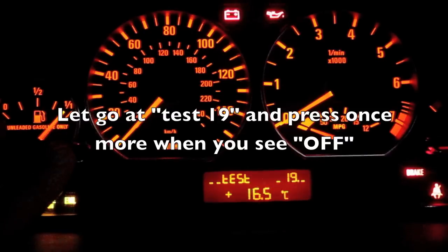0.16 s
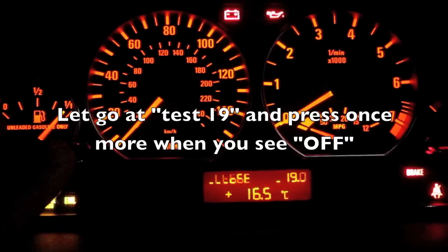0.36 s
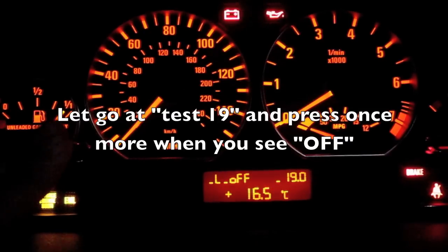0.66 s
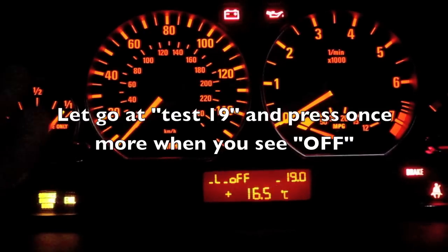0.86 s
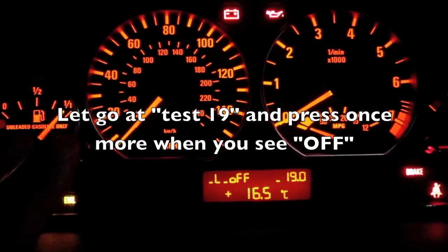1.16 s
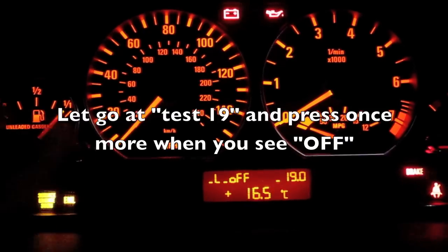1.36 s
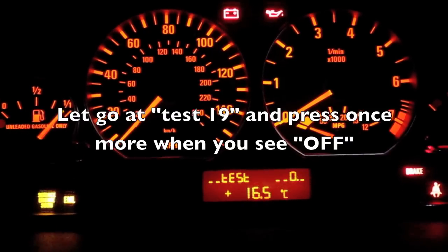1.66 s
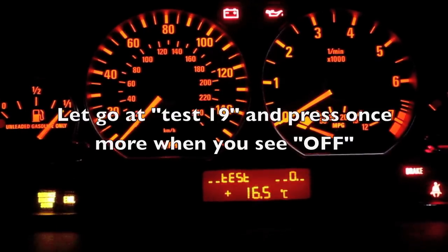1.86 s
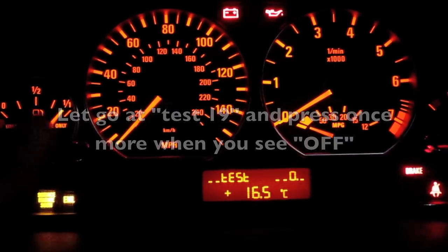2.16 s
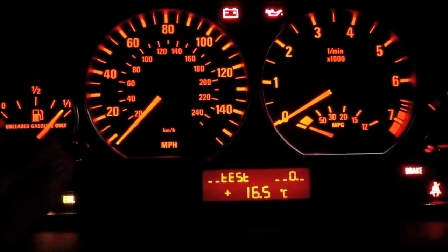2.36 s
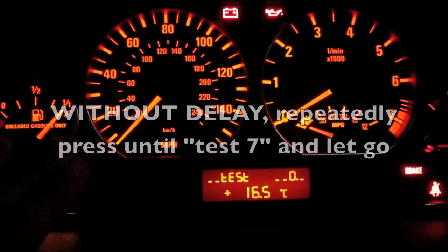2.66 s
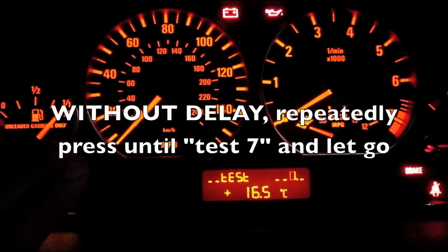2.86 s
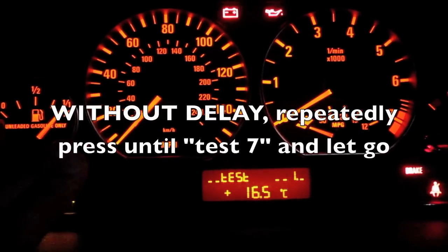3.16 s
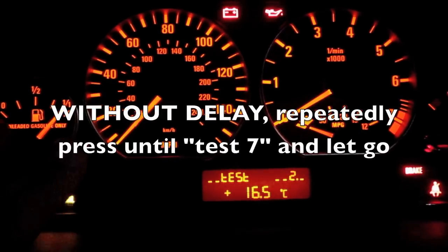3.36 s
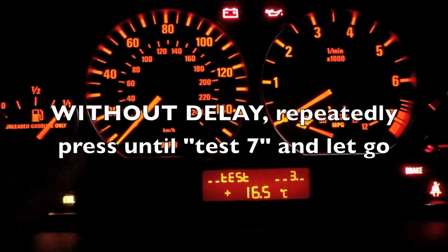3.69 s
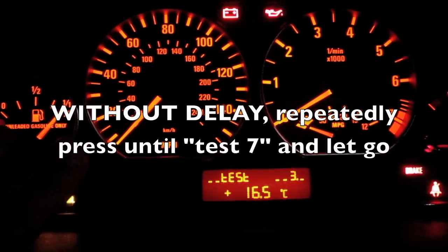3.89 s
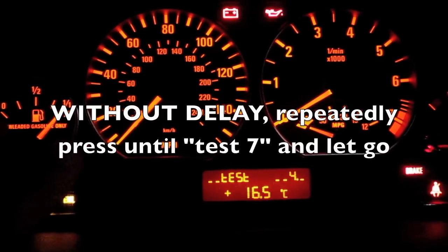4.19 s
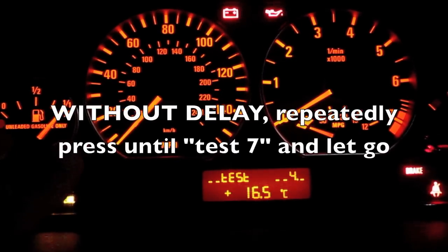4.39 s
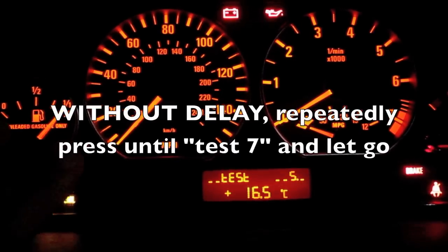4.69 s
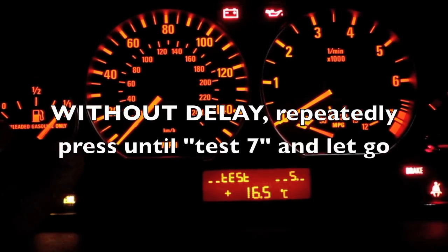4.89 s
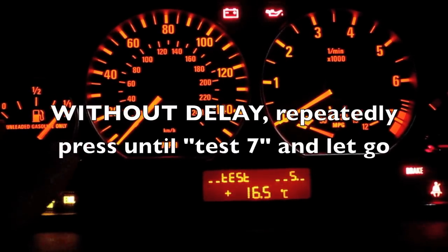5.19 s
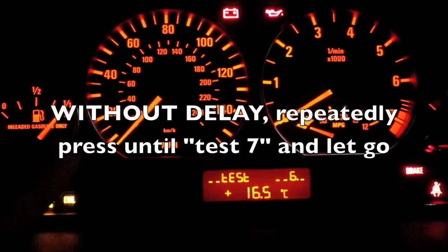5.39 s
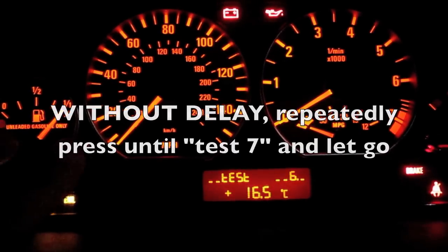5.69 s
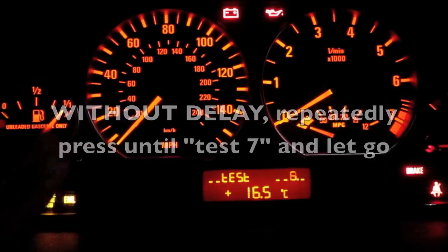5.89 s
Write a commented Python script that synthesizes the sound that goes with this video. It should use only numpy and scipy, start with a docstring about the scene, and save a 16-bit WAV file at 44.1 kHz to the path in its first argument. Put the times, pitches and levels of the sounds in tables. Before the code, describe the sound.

A small plastic dashboard button is pressed eight times, each a crisp click and softer release, over a low wavering hum in a parked car.

```python
"""A low, slightly wavering hum over rumble and faint hiss; then a small panel button is pressed eight times.
On each press the stem rubs in and catches in its guide, and a spring contact snaps and rings.
On release the contact opens with one bounce and the stem rubs out; loose knocks, ticks and nudges surround it.
Contacts, knocks and nudges ring decaying modes of one plastic panel; rubs and ticks are shaped noise.
All button sounds scatter in the small, well damped cabin of a parked car."""
import sys
import numpy as np
from scipy import signal
from scipy.fft import rfft, irfft
from scipy.io import wavfile

SR = 44100
rng = np.random.default_rng(int(sys.argv[2]) if len(sys.argv) > 2 else 0)


def wav_out(sig):
    """Save sig, one row per channel (or a flat mono array), as 16-bit PCM at SR to the path in sys.argv[1]."""
    wavfile.write(sys.argv[1], SR, np.round(np.clip(np.atleast_2d(sig).T, -1, 1) * 32767).astype(np.int16))


N = 266452
RING_S = np.arange(8192) / SR  # time axis of one ring or echo


def from_db(db):
    """Decibels to amplitude gain."""
    return 10 ** (np.asarray(db) / 20)


def add(track, start_s, sound):
    """Mix a sound into the track at start_s, cut at the track end."""
    at = int(round(start_s * SR))
    track[at:at + len(sound)] += sound[:N - at]


def noise(colour, size):
    """Noise of rms 1; colour levels are interpolated over log frequency."""
    colour_hz, colour_db = np.transpose(colour)
    bins_hz = np.maximum(np.fft.rfftfreq(size, 1 / SR), 1)
    gain = from_db(np.interp(np.log(bins_hz), np.log(colour_hz), colour_db))
    x = irfft(rfft(rng.standard_normal(size)) * gain, size)
    return x / x.std()


def burst(colour, t60_s, rise_s):
    """Countless short-lived modes ring as a dying puff of noise."""
    decay = from_db(-60 * RING_S / t60_s)
    onset = 1 - np.exp(-RING_S / rise_s)
    return noise(colour, len(RING_S)) * decay * onset


def low_pass(x, corner_hz):
    """A softer contact loses the treble above its corner."""
    return signal.sosfilt(signal.butter(2, min(corner_hz, .45 * SR), fs=SR, output="sos"), x)


def peak(x, hz, width_hz):
    """The part of x that passes one resonance."""
    return signal.lfilter(*signal.iirpeak(hz, hz / width_hz, fs=SR), x)


def struck(hz, t60_s, level_db, vary_db):
    """Struck modes decay as damped sines; level_db is resonance height, varied randomly per blow."""
    decay_per_s = np.log(1000) / t60_s
    height = from_db(level_db + vary_db * rng.standard_normal(len(hz)))
    amplitude = height * 2 * decay_per_s / SR
    envelopes = np.exp(-np.outer(decay_per_s, RING_S))
    return amplitude @ (envelopes * np.sin(2 * np.pi * np.outer(hz, RING_S)))


# rumble and hiss spectrum: (frequency [Hz], relative level [dB per Hz])
AIR_COLOUR = [(18, -15.5), (27, -14), (35, -10), (55, -4.5), (100, -9), (160, -14.5), (220, -19.5),
              (300, -23.5), (500, -29.5), (1000, -32.5), (2500, -41), (6300, -45.5), (11700, -44),
              (16000, -53.5)]
# hum tones: (frequency [Hz], level [dB], wavering rate [1/s])
HUM_TONES = [(48.6, -47, 2.9), (73.04, -52, 1.3), (135.6, -58.5, 1.5)]


def hum(air_db=-46.5, waver=0.65):
    """Low tones waver in strength and phase by slow complex noise, over rumble and faint hiss."""
    t_s = np.arange(N) / SR
    out = from_db(air_db) * noise(AIR_COLOUR, N)
    for hz, level_db, rate_hz in HUM_TONES:
        slow_colour = [(rate_hz, 0), (4 * rate_hz, -24), (16 * rate_hz, -100)]
        drift = noise(slow_colour, N) + 1j * noise(slow_colour, N)
        tone = ((1 + waver * drift) * np.exp(2j * np.pi * hz * t_s)).real
        out = out + from_db(level_db) * tone / tone.std()
    return out


# panel modes: (frequency [Hz], t60 before ring_share [s],
#   level by press [dB], level by release [dB], level by stem knock [dB])
PANEL_MODES = [(132, 0.052, 18, 8, 9), (200.9, 0.099, 15, 6.5, 4), (264, 0.13, -2, 11, 0),
               (355, 0.26, -26, 15, -24), (419, 0.078, 10, 11.5, 13), (455, 0.078, 17, 8, 9),
               (510.5, 0.058, 6, 15, 11), (571, 0.073, 15, 8.5, 14), (598, 0.055, 14.5, 6, 11),
               (657, 0.04, 11.5, 9, 1.5), (755, 0.064, -9, -14, 5.5), (840, .06, -2, 5.5, 6),
               (958, 0.07, 9.5, 15.5, 11), (1058, 0.048, 7.5, -1.5, 12.5), (1184, 0.055, -7, 11.5, 8),
               (1262, 0.048, 7.5, 6, -2), (1369, 0.026, 4.5, -2, 10), (1587, 0.018, 7, 4, 11),
               (1729, 0.026, 1.5, -2.5, -5), (1843, 0.047, -17, -8, 1), (2057, 0.058, 5, -36, -1.5),
               (2180, 0.037, -30, -39, -1.5), (2810, 0.03, -3, -12, -6), (3253, 0.036, -7, -23.5, 0),
               (4120, 0.034, -10, -8.5, -8), (5005, .015, -14, -19, -10), (5780, 0.0148, -30, -13, -17)]
BY_PRESS, BY_RELEASE, BY_KNOCK = 0, 1, 2


def panel_blow(kind, vary_db, level_db, corner_hz, clack_db, clack_hz,
               ring_share=1, clack_q=2.9, radiate_hz=150):
    """One contact rings the panel; where it lands decides which pitch of the plastic clacks most."""
    hz, t60_s, *levels_db = np.transpose(PANEL_MODES)
    x = struck(hz, ring_share * t60_s, levels_db[kind], vary_db)
    x = x + (from_db(clack_db) - 1) * peak(x, clack_hz, clack_hz / clack_q)
    # all-pass: bending waves travel at unequal speeds, low notes come a moment after the crack
    for delay_hz, width_hz in ((460.0, 230), (1040, 520), (2300, 190), (4215, 490)):
        x = x - 2 * peak(x, delay_hz, width_hz)
    # a small panel radiates little bass
    x = signal.sosfilt(signal.butter(2, radiate_hz, "high", fs=SR, output="sos"), x)
    return from_db(level_db) * low_pass(x, corner_hz)


def fidgets(count=8, first_s=2.45, last_s=5.6, level_db=-25, corner_hz=1100, vary_db=2.5):
    """The resting finger nudges the stem: faint dull panel blows, one at random in each equal slot."""
    out = np.zeros(N)
    slot_s = (last_s - first_s) / count
    for k, chance in enumerate(rng.random(count)):
        nudge = panel_blow(BY_KNOCK, vary_db, level_db, corner_hz, clack_db=0, clack_hz=corner_hz)
        add(out, first_s + slot_s * (k + chance), nudge)
    return out


# stem resonances under friction: (frequency [Hz], width [Hz], level [dB])
STEM_MODES = [(1053, 188, 17), (1680, 550, 11), (2253, 840, 6.5), (4183, 1200, -0.5), (5020, 333, 5.5),
              (5700, 283, 2.5), (6390, 350, 3.5), (10100, 2500, -2.5), (12500, 2000, -5.5)]


def rub(length_s, level_db, grain_db=4.0, vary_db=2.5):
    """Grainy friction rings the stem modes, with alternating sign, while it travels."""
    size = int(length_s * SR)
    grain = noise([(100, -19), (400, -15), (2000, -18)], size)
    friction = rng.standard_normal(size) * from_db(grain_db * grain)
    x = np.zeros(size)
    for k, (hz, width_hz, mode_db) in enumerate(STEM_MODES):
        gain = from_db(mode_db + vary_db * rng.normal())
        x += gain * (-1) ** k * peak(friction, hz, width_hz)
    return from_db(level_db) * x / x.std() * signal.windows.tukey(size, .3)


# stem tick spectrum: (frequency [Hz], relative level [dB per Hz])
TICK_COLOUR = [(500, 4.5), (1200, 3.5), (2000, 1.5), (2800, -0.5), (3400, -6), (4200, -0.5), (6000, -10),
               (9000, -5.5), (10700, -1.5), (13000, -9), (16000, -20)]


def tick(level_db, corner_hz):
    """The stem ticks sharply against its guide: a short low-passed noise burst."""
    return from_db(level_db) * low_pass(burst(TICK_COLOUR, t60_s=0.017, rise_s=0.00024), corner_hz)


# contact closes; also played by presses():
#   (time [s], clack level [dB], inward rub level [dB], catch level [dB])
PRESSES = [(1.2349, -2.5, -49, -36.5), (2.6430, 5.5, -50.5, -33), (3.0274, 4.5, -52.5, -35.5),
           (3.448, 5, -57, -50), (3.8512, -5, -53, -34.5), (4.3171, 0, -55, -37),
           (5.0010, 10.5, -50.5, -34.5), (5.6400, 6, -57, -55)]
# contact opens; also played by releases(): (time [s], clack level [dB], outward rub level [dB])
RELEASES = [(1.3816, -0.5, -51), (2.735, -2, -57.5), (3.1430, -1.5, -58.5), (3.5534, -1, -57.5),
            (3.9790, -1.5, -51.5), (4.4476, 0, -52), (5.1284, -0.5, -51), (5.7806, -1, -51)]
# loose stem ticks sideways in its guide: (time [s], level [dB], brightness corner [Hz])
SIDE_TICKS = [(1.286, -32, 15300), (1.295, -21, 11900), (1.421, -34, 12000), (2.8749, -32.5, 11600),
              (5.8144, -28, 6100), (5.845, -32, 6000)]


def stem(usual_in_s=.068, usual_rub_db=-53, halving_db=9, over_s=.009, out_s=0.067,
         catch_lead_s=.027, catch_corner_hz=15000):
    """The stem rubs and catches on its way in, rubs on its way out, and ticks in its guide."""
    out = np.zeros(N)
    for press_s, _, rub_db, catch_db in PRESSES:
        # a quicker push rubs louder: travel time halves per halving_db
        travel_s = usual_in_s * .5 ** ((rub_db - usual_rub_db) / halving_db)
        add(out, press_s - travel_s, rub(travel_s + over_s, rub_db))
        add(out, press_s - catch_lead_s, tick(catch_db, catch_corner_hz))
    for release_s, _, rub_db in RELEASES:
        add(out, release_s, rub(out_s, rub_db))
    for tick_s, level_db, corner_hz in SIDE_TICKS:
        add(out, tick_s, tick(level_db, corner_hz))
    return out


# stem knocks on its stop or under the finger:
#   (time [s], level [dB], brightness corner [Hz], clack level [dB], clack frequency [Hz])
KNOCKS = [(1.1078, -14.5, 3000, -2, 1300), (1.1990, -20, 5020, 8, 1100), (1.2944, -17.5, 9000, 17.5, 2790),
          (1.405, -7.5, 2500, -13, 1500), (1.4230, 0, 5750, 3.5, 1160), (2.2623, -9, 1350, -13, 1560),
          (2.4016, -13, 2600, 7, 398), (2.8087, -11.5, 520, 9.5, 423), (3.2111, -12, 2590, 12.5, 415),
          (3.692, -26, 4000, 17, 1270), (3.7386, -4, 1485, 4.5, 1360), (4.0458, 2, 4530, 1.5, 1800),
          (4.157, -26.5, 2200, 17, 1520), (4.5328, -0.5, 5200, 7, 1660), (5.1971, -2, 4500, -6.5, 1707),
          (5.8136, -11, 7000, 4, 2000), (5.836, 1.5, 3980, -28.5, 1730)]


def knocks(vary_db=1.5, ring_share=0.82):
    """Loose stem knocks ring the panel for less time than the contacts do."""
    out = np.zeros(N)
    for knock_s, *blow in KNOCKS:
        add(out, knock_s, panel_blow(BY_KNOCK, vary_db, *blow, ring_share=ring_share))
    return out


SWITCH_CLACK_HZ, SWITCH_VARY_DB = 1600, 1.5


def releases(ease_lead_s=.029, ease_db=-23, ease_corner_hz=1580, ease_vary_db=1.5,
             level_db=.7, corner_hz=5950, open_db=-3, bounce_s=.00475, bounce_db=-7):
    """The stem shifts softly as the finger eases, then the contact opens and bounces once."""
    out = np.zeros(N)
    for release_s, clack_db, _ in RELEASES:
        ease = panel_blow(BY_KNOCK, ease_vary_db, ease_db, ease_corner_hz, clack_db, SWITCH_CLACK_HZ)
        add(out, release_s - ease_lead_s, ease)
        for lag_s, hit_db in ((0, open_db), (bounce_s, bounce_db)):
            hit = panel_blow(BY_RELEASE, SWITCH_VARY_DB, level_db + hit_db, corner_hz,
                             clack_db, SWITCH_CLACK_HZ)
            add(out, release_s + lag_s, hit)
    return out


# snapping spring modes: (frequency [Hz], t60 [s], level [dB])
SPRING_MODES = [(9320, 0.081, 1.5), (9960, 0.038, -8.5), (10200, 0.018, 0), (10700, 0.03, -19),
                (11180, 0.062, -0.5), (12000, .035, -12.5)]
# snap noise spectrum: (frequency [Hz], relative level [dB per Hz])
SNAP_COLOUR = [(2000, -8), (5000, -21.5), (8500, -9), (9600, -4), (10600, 7.5), (11600, -4.5), (12800, -14),
               (14200, -15), (16000, -25.5)]


def spring_snap(level_db=-1, snap_db=-23):
    """The spring rings its high modes under a short puff of snap noise."""
    ring = struck(*np.transpose(SPRING_MODES), SWITCH_VARY_DB)
    snap = burst(SNAP_COLOUR, t60_s=0.015, rise_s=0.00032)
    return from_db(level_db) * (ring + from_db(snap_db) * snap)


def presses(level_db=-0.98, corner_hz=9000, spring_lag_s=.0007):
    """The closing contact strikes the panel almost alike every time; the spring rings just after."""
    out = np.zeros(N)
    for press_s, clack_db, _, _ in PRESSES:
        hit = panel_blow(BY_PRESS, SWITCH_VARY_DB, level_db, corner_hz, clack_db, SWITCH_CLACK_HZ)
        add(out, press_s, hit)
        add(out, press_s + spring_lag_s, spring_snap())
    return out


# cabin echo spectrum: (frequency [Hz], relative level [dB per Hz])
SCATTER_COLOUR = [(200, -5), (500, 13), (1000, -1), (2000, 2), (4000, 3), (8000, 3.5), (11000, -6),
                  (16000, 0)]


def cabin(x, near_db=-11, near_t60_s=0.036, far_db=-20, far_t60_s=0.12, rise_s=0.0054):
    """Dense early scatter off the wheel and glass, then a faint tail that the seats soon swallow."""
    response = np.zeros(len(RING_S))
    for level_db, t60_s in ((near_db, near_t60_s), (far_db, far_t60_s)):
        echoes = burst(SCATTER_COLOUR, t60_s, rise_s)
        response += from_db(level_db) * echoes / np.linalg.norm(echoes)
    return x + signal.fftconvolve(x, response)[:N]


def scene():
    """The button in the cabin, over the hum."""
    background = hum()
    button = fidgets() + stem() + knocks() + releases() + presses()
    return (cabin(button) + background)[None]


def record(dry, notch_hz=7886, notch_width_hz=2290, cutoff_hz=16000):
    """The microphone has a deep notch in the treble; a steep low-pass cuts the top."""
    notched = dry - peak(dry, notch_hz, notch_width_hz)
    return signal.sosfilt(signal.ellip(10, .1, 80, cutoff_hz, fs=SR, output="sos"), notched)


dry = scene()
out = record(dry)
wav_out(out)
```